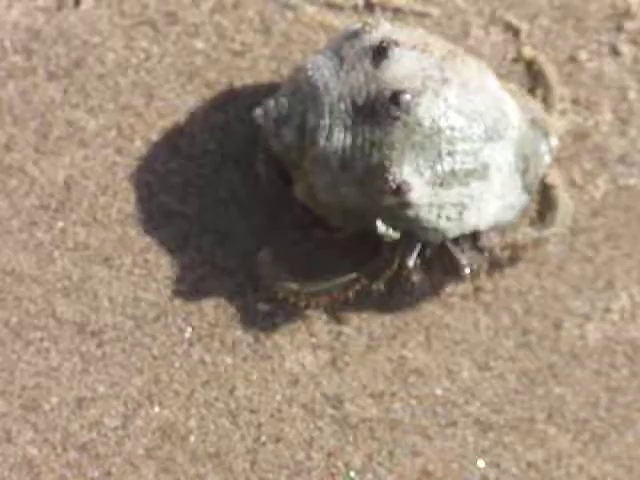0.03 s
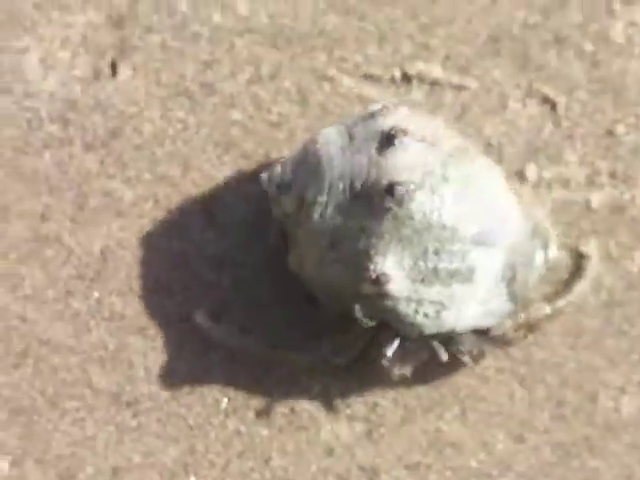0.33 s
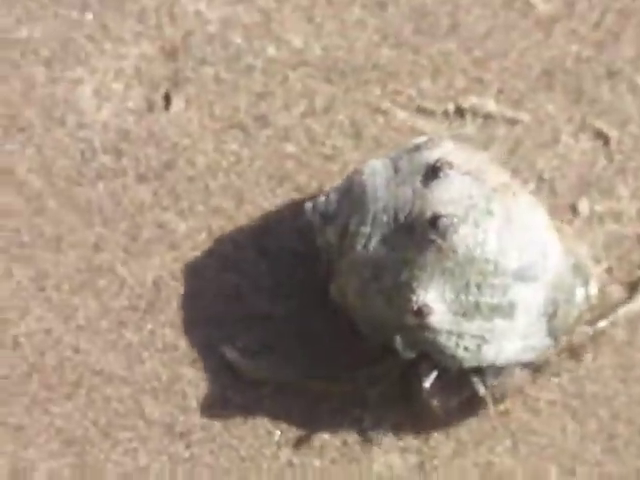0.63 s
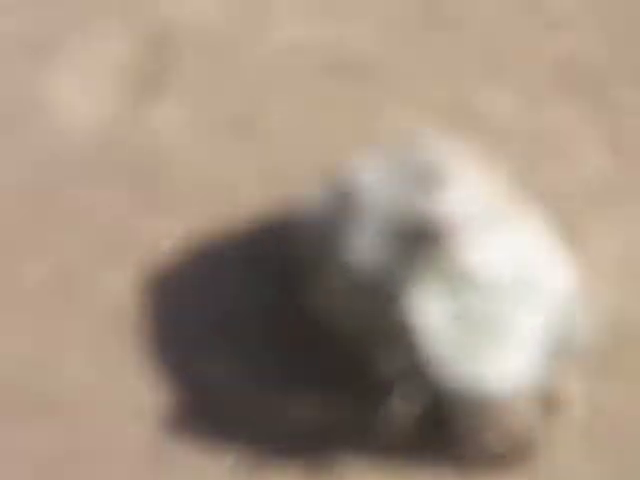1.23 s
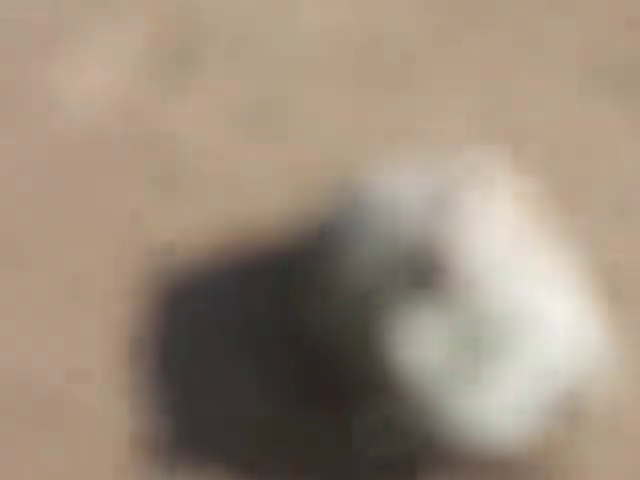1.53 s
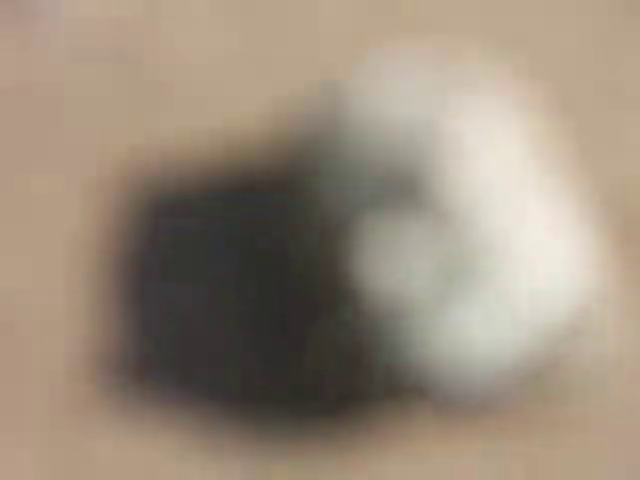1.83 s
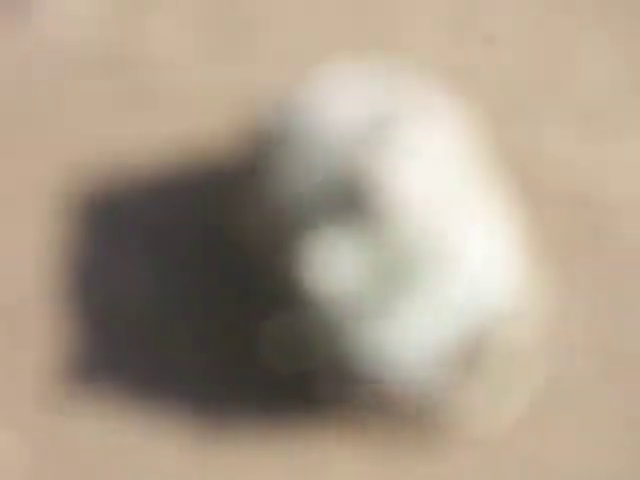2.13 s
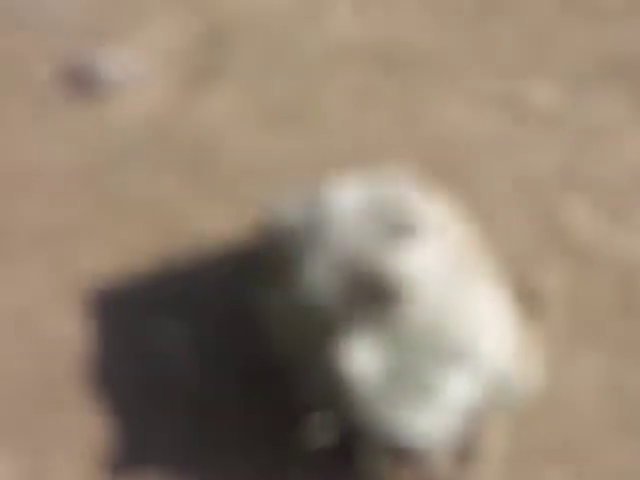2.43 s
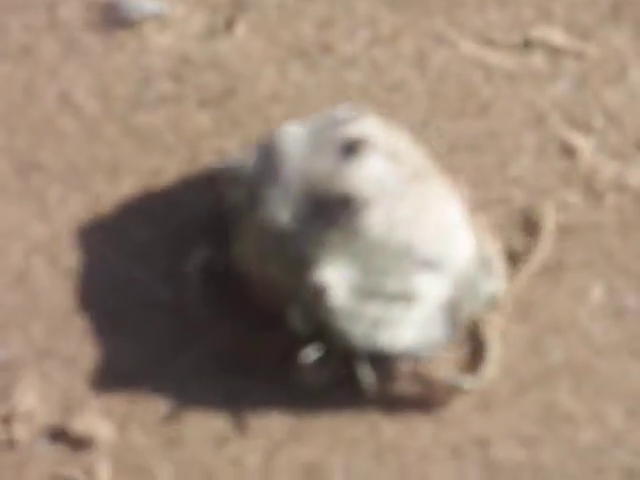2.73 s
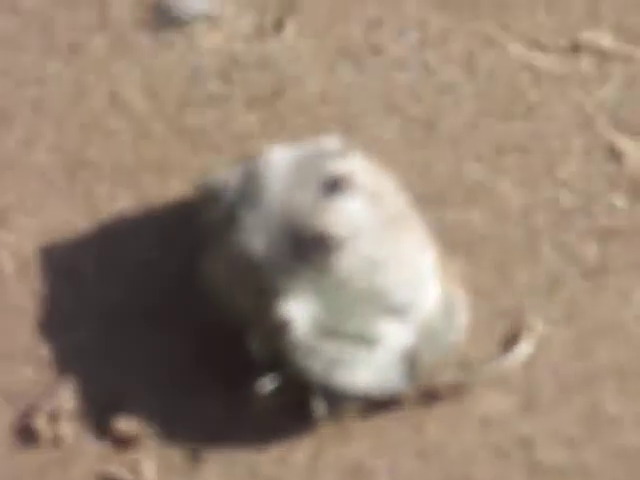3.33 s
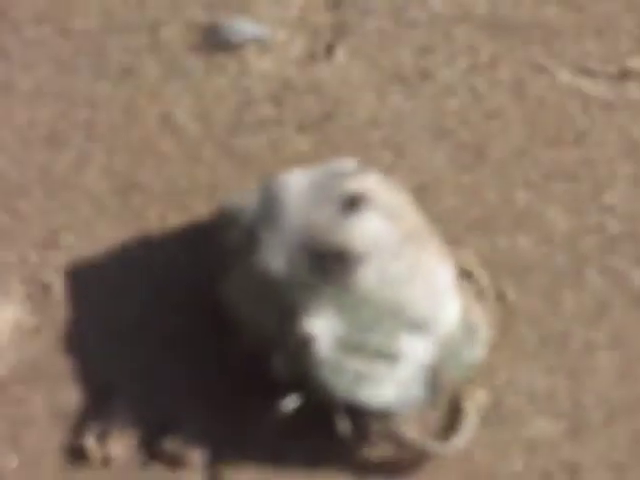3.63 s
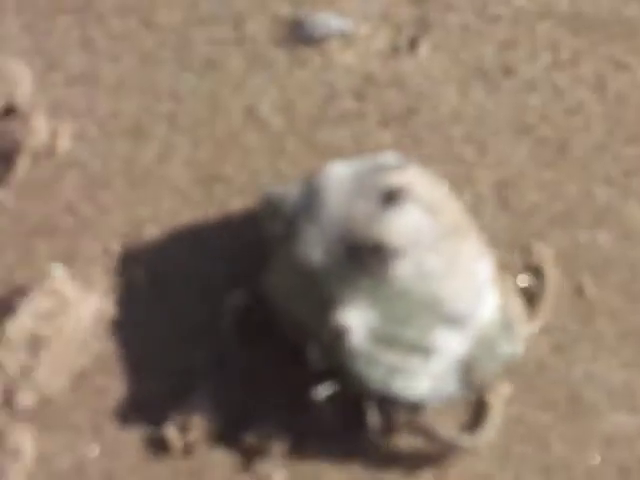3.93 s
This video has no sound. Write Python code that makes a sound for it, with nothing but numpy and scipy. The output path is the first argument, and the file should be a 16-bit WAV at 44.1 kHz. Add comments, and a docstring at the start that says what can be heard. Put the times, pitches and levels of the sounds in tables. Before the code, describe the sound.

Gusty wind rumbling on the microphone over a steady hiss of distant surf.

```python
"""A breezy beach, heard from just above the sand through a small two-port microphone.
Distant surf washes in from the right as an even bed of hiss. Wind buffets the ports, mostly the right
one, with a rolling rumble, puffs and sharp slaps. Three faint ticks of tiny hard contacts ring close by.
The sound cuts in after a short silence, and the whole mix dips briefly now and then."""
import sys
import numpy as np
from scipy import signal
from scipy.fft import rfft, irfft
from scipy.io import wavfile

SR = 44100
rng = np.random.default_rng(int(sys.argv[2]) if len(sys.argv) > 2 else 0)


def store_pcm(level_fs):
    """Save levels as 16-bit WAV."""
    pcm = np.round(np.clip(level_fs, -1, 1) * 32767).astype(np.int16)
    wavfile.write(sys.argv[1], SR, np.atleast_2d(pcm).T)


N = 176400

# Tone of the surf bed: f/Hz, left level/dB, right level/dB, share common to both ports/0-1
SURF_SPECTRUM = [(100, -56, -61.5, 0.8), (248, -54, -50, 0.81), (493, -56, -58, 0.83),
                 (720, -63.5, -63, 0.99), (860, -61, -62, 0.9), (1385, -68, -70.5, 1),
                 (1760, -78, -72.5, 0.42), (2900, -75, -69, 0.71), (3400, -81.5, -70.5, 0.5),
                 (4250, -73, -72.5, 0), (5000, -74.5, -70.5, 0.1), (6540, -72, -81.5, 0.1),
                 (7380, -89, -81, .2), (8860, -108, -119, 0)]
# Ring of each port, left row then right: f/Hz, width/Hz, lift/dB
PORT_RESONANCES = [(6000, 470, 4), (5110, 830, 7)]
# Fader ride on the surf: t/s, level/dB
SURF_FADER = [(.37, 6.5), (.51, 10), (.58, 2.5), (1.3, -0.1), (2.0, 0), (2.4, 0.27), (3.1, -0.9),
              (3.3, 2.5), (3.422, 2), (3.44, -3.5), (4, -3)]
# Tone of the wind rumble: f/Hz, left level/dB, right level/dB
WIND_SPECTRUM = [(12, -33, -34), (30.2, -31.5, -29.5), (51.6, -36.5, -31), (92, -43.5, -33.5),
                 (175.7, -53.5, -40), (330, -63.5, -48), (674, -69, -64), (1280, -84, -80),
                 (2600, -105, -103)]
# Gusts on the left port: t/s, level/dB
LEFT_GUSTS = [(.37, 9.5), (.6, -1), (.8, 1), (1.1, -5), (1.6, -1), (1.9, 1), (2.6, 2), (3.0, 1),
              (3.4, -5.5), (3.5, -0.5), (4, -4.5)]
# Gusts on the right port: t/s, level/dB
RIGHT_GUSTS = [(.37, -1.5), (.43, 1.5), (.52, 7.5), (.67, 3.5), (.75, 0), (.95, -2.5), (1.28, -1.5),
               (1.39, 2.5), (1.56, -3), (1.8, -5), (1.9, 2.5), (2.04, 6.5), (2.14, -3.5), (2.42, 2.5),
               (2.55, -3.5), (2.68, 1), (2.92, 1), (3.07, -3.5), (3.22, -0.5), (3.41, -3), (3.56, -1),
               (3.7, -6), (3.86, 0.5), (4, -2.5)]
# Single puffs on top of the gusts: t/s, half-length/s, left lift/dB, right lift/dB
WIND_PUFFS = [(0.37, 0.013, -1, 7.5), (0.663, 0.015, 17.5, 4), (1.746, 0.024, 3.5, 3),
              (2.227, 0.022, -1.5, 1.5), (3.188, 0.015, 4.5, 0.5), (3.415, 0.012, 11, 7.5)]
# Sharp slaps of wind: t/s, level/dB, pan as left minus right/dB
WIND_SLAPS = [(0.375, -20.5, -11), (0.386, -17.5, -7), (0.517, -19, -10), (0.584, -14, -11.5),
              (.645, -17, -1), (0.681, -17, -8), (1.399, -28, -6), (1.53, -27, -11), (1.899, -18.5, -10),
              (2.016, -22, -7), (2.046, -23, -14), (2.643, -20.5, -4), (2.688, -17.5, -4),
              (2.936, -16.5, -7), (3.643, -29.5, -10)]
# Brief dips of the whole mix: t/s, depth/dB
LEVEL_DIPS = [(.385, 5), (.575, 4), (0.682, 5.5), (1.419, 4), (2.03, 2.5), (2.422, 1.1), (2.648, 2.5),
              (3.429, 3.5)]
# Close ticks: t/s, level/dB, pan as left minus right/dB
TICK_CUES = [(1.5245, -26, .5), (2.1962, -14, 3), (2.8685, -19, 1)]
# Partials of a tick: f/Hz, level/dB, time to fall 60 dB/s
TICK_PARTIALS = [(3900, -11, .004), (5150, -4, .009), (5700, 1, 0.0043), (6300, -4, 0.0036)]

SURF_LEFT_LAG_S = 0.00021
SURF_FLICKER_DB, SURF_FLICKER_HZ = 0.23, 36
EDDY_DB, EDDY_HZ = 1.53, 12   # slow swirls: depth, rate
BURST_DB, BURST_HZ = 3.5, 37   # quick turbulence: depth, rate
CROSSOVER_HZ, GUST_BRIGHTENING = 132, 0.44   # bursts above this gain extra dB per dB of gust
SLAP_HALF_LENGTH_S, SLAP_LOW_HZ, SLAP_HIGH_HZ = 0.0027, 260, 765
DIP_ATTACK_S, DIP_HOLD_S, DIP_RELEASE_DB_PER_S = 0.0029, 0.079, 22
START_S, CLIP_CEILING, HIGH_CUT_HZ = .3724, .96, 8400

TIME = np.arange(N) / SR
FREQ = np.maximum(np.arange(N // 2 + 1) * SR / N, 1)


def from_db(db):
    """Decibels to gain."""
    return 10 ** (np.asarray(db) / 20)


def panned(sound, db, pan_db):
    """A mono sound placed in stereo; positive pan leans left."""
    return np.outer(from_db([db + pan_db / 2, db - pan_db / 2]), sound)


def swell(centre_s, half_length_s):
    """A bell-shaped rise and fall."""
    return np.exp(-.5 * ((TIME - centre_s) / half_length_s) ** 2)


def automation(rows):
    """A fader curve, straight between its points."""
    return np.interp(TIME, *np.transpose(rows))


def eq_curves(rows):
    """The columns of a spectrum table, drawn across log frequency."""
    hz, *columns = np.transpose(rows)
    return np.array([np.interp(np.log(FREQ), np.log(hz), column) for column in columns])


def white_spectra(channels):
    """Spectra of unrelated white noises at 0 dB per Hz."""
    return rfft(rng.standard_normal((channels, N))) * np.sqrt(SR / 2)


def drift(rate_hz, channels):
    """Smooth random modulation with a spread of 1."""
    wander = irfft(white_spectra(channels) / (1 + (FREQ / rate_hz) ** 2), N)
    return wander / wander.std(axis=1, keepdims=True)


def surf():
    """Far breakers: an even wash, partly common to both ports, coloured by each port's ring."""
    left_db, right_db, common = eq_curves(SURF_SPECTRUM)
    delay = np.exp(-2j * np.pi * FREQ * np.array([[SURF_LEFT_LAG_S], [0]]))
    shared = np.sqrt(common) * white_spectra(channels=1) * delay
    diffuse = np.sqrt(1 - common) * white_spectra(channels=2)
    ring_db = [lift / (1 + (2 * (FREQ - hz) / width) ** 2) for hz, width, lift in PORT_RESONANCES]
    tone = from_db(np.array([left_db, right_db]) + ring_db)
    wash = irfft((shared + diffuse) * tone, N)
    flicker_db = SURF_FLICKER_DB * drift(SURF_FLICKER_HZ, channels=1)
    return wash * from_db(automation(SURF_FADER) + flicker_db)


def wind():
    """Each port has its own turbulence: rolling bass, and above it bursts that outgrow the gust."""
    gust_db = np.array([automation(LEFT_GUSTS), automation(RIGHT_GUSTS)])
    gust_db += EDDY_DB * drift(EDDY_HZ, channels=2)
    for at_s, half_length_s, left_db, right_db in WIND_PUFFS:
        gust_db += np.outer([left_db, right_db], swell(at_s, half_length_s))
    rumble = white_spectra(channels=2) * from_db(eq_curves(WIND_SPECTRUM))
    bass_share = 1 / (1 + (FREQ / CROSSOVER_HZ) ** 2)
    bass = irfft(rumble * bass_share, N)
    mids = irfft(rumble * (1 - bass_share), N)
    burst_gain = from_db(GUST_BRIGHTENING * gust_db + BURST_DB * drift(BURST_HZ, channels=2))
    return from_db(gust_db) * (bass + burst_gain * mids)


def slaps():
    """Small fast eddies hit the ports: a few milliseconds of low-mid noise each."""
    rolloff = np.sqrt((1 + (SLAP_LOW_HZ / FREQ) ** 4) * (1 + (FREQ / SLAP_HIGH_HZ) ** 8))
    noise = irfft(white_spectra(channels=2) / rolloff, N)
    envelope = sum(panned(swell(at_s, SLAP_HALF_LENGTH_S), db, pan_db) for at_s, db, pan_db in WIND_SLAPS)
    return envelope * noise / noise.std()


def dips():
    """Gain for the mix: at each cue it drops fast, holds, and climbs back at a steady rate."""
    cut_db = np.zeros(N)
    for at_s, depth_db in LEVEL_DIPS:
        age = TIME - at_s
        attack = np.clip(age / DIP_ATTACK_S, 0, 1)
        released_db = DIP_RELEASE_DB_PER_S * np.maximum(age - DIP_HOLD_S, 0)
        cut_db = np.maximum(cut_db, attack * (depth_db - released_db))
    return from_db(-cut_db)


def ticks():
    """Tiny hard contacts, perhaps blown sand, that ring for a few milliseconds."""
    age = TIME[:SR // 20]
    ring = sum((-1) ** k * from_db(db - 60 * age / t60) * np.sin(2 * np.pi * hz * age)
               for k, (hz, db, t60) in enumerate(TICK_PARTIALS))
    track = np.zeros((2, N))
    for at_s, db, pan_db in TICK_CUES:
        start = int(at_s * SR)
        track[:, start:start + len(ring)] += panned(ring, db, pan_db)
    return track


def scene():
    """Surf bed, wind, slaps and ticks, all dipping together."""
    return (surf() + wind() + slaps() + ticks()) * dips()


def record(dry):
    """Master chain: a soft clip rounds the hardest buffets, the sound cuts in, the top is cut steeply."""
    rounded = dry / (1 + (dry / CLIP_CEILING) ** 4) ** .25
    high_cut = signal.ellip(10, .1, 80, HIGH_CUT_HZ, fs=SR, output="sos")
    return signal.sosfilt(high_cut, rounded * (TIME >= START_S))


dry = scene()
out = record(dry)
store_pcm(out)
```